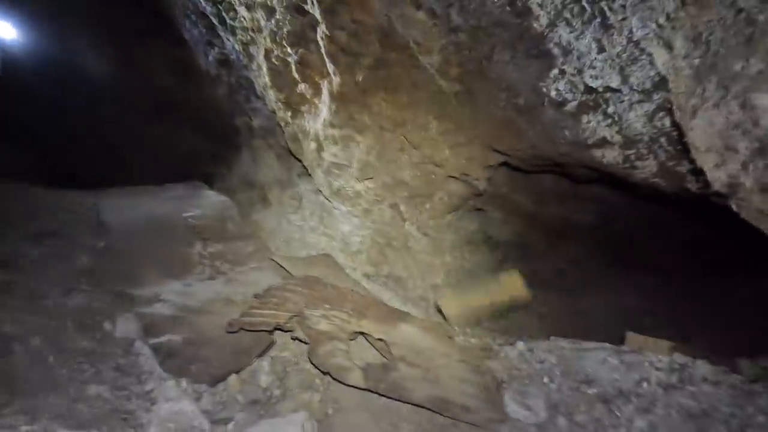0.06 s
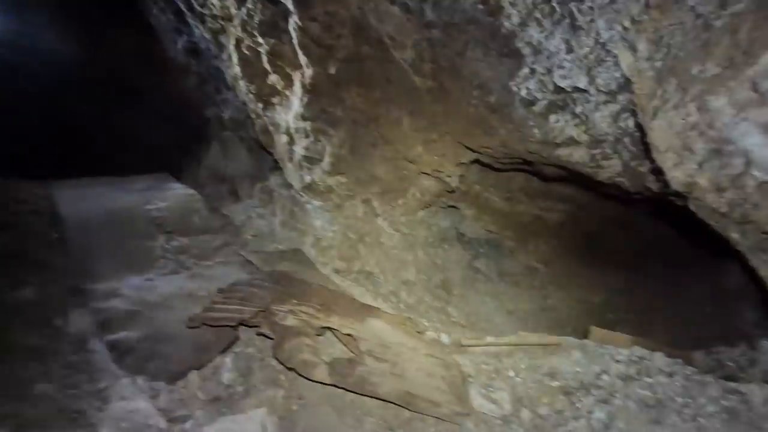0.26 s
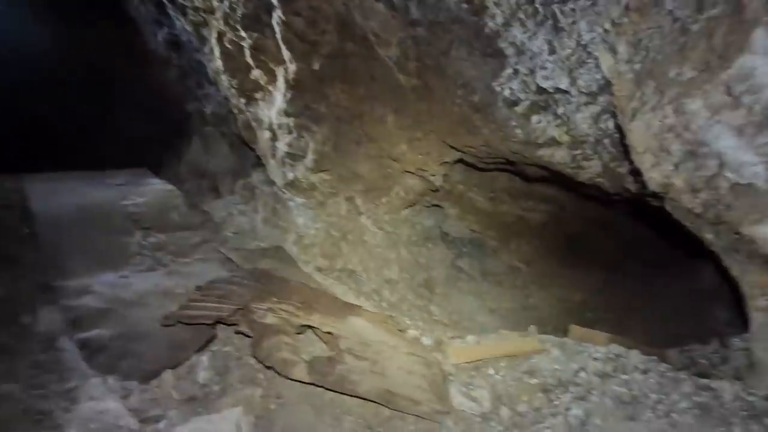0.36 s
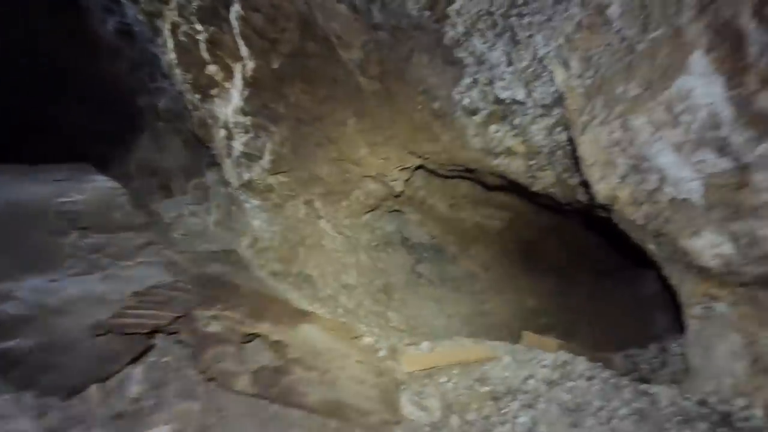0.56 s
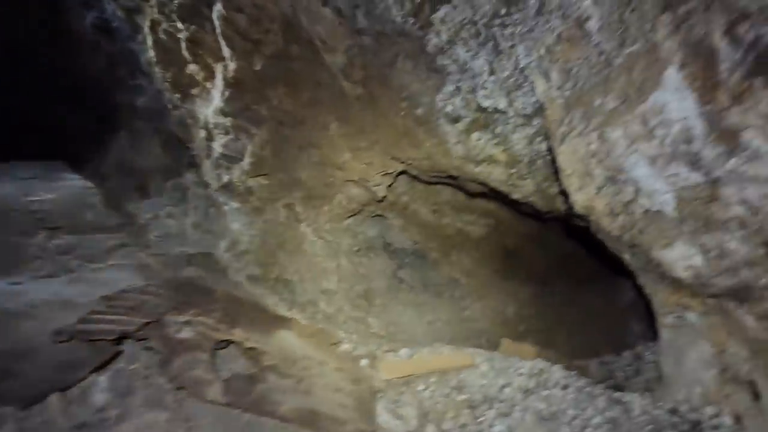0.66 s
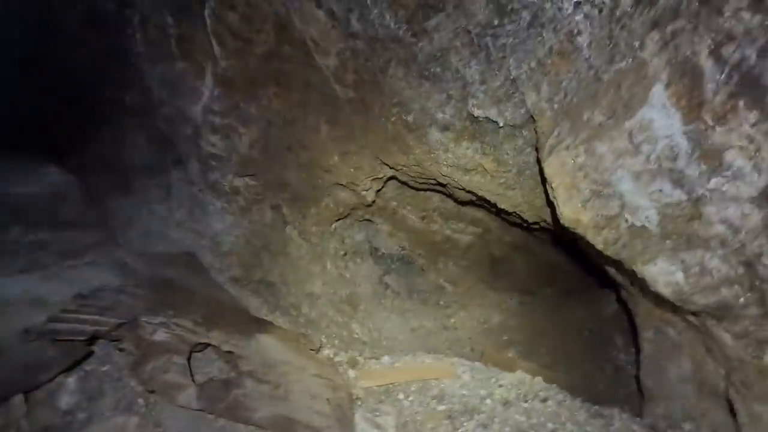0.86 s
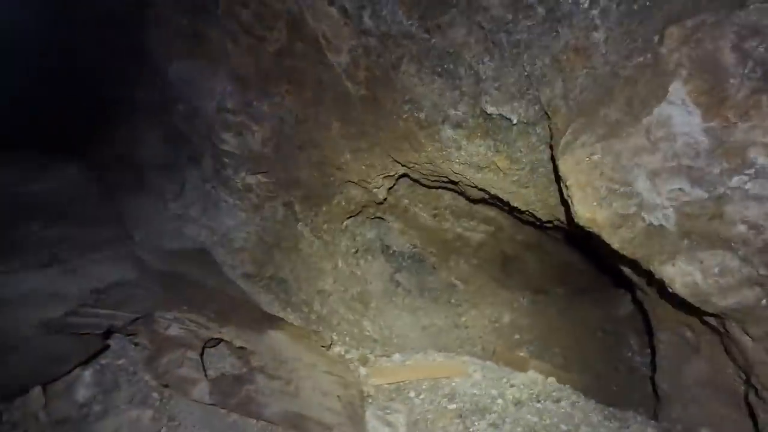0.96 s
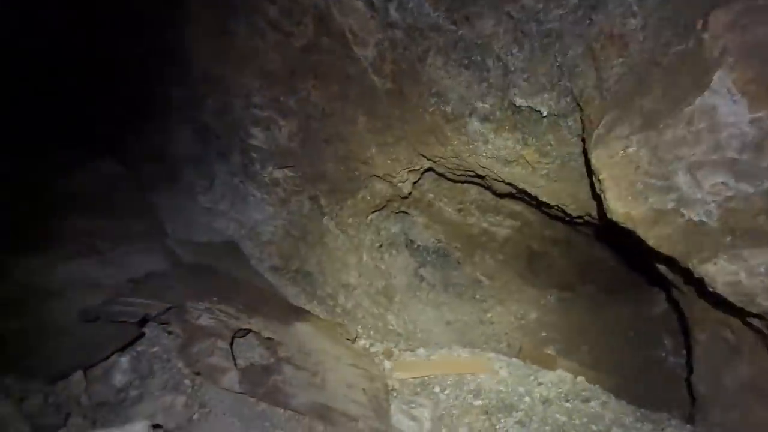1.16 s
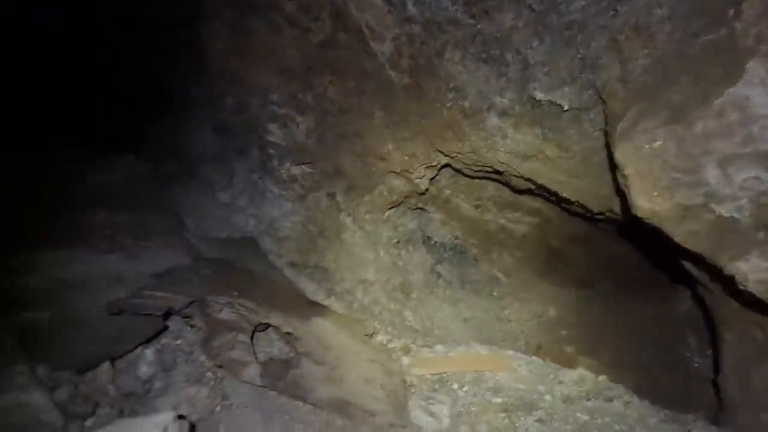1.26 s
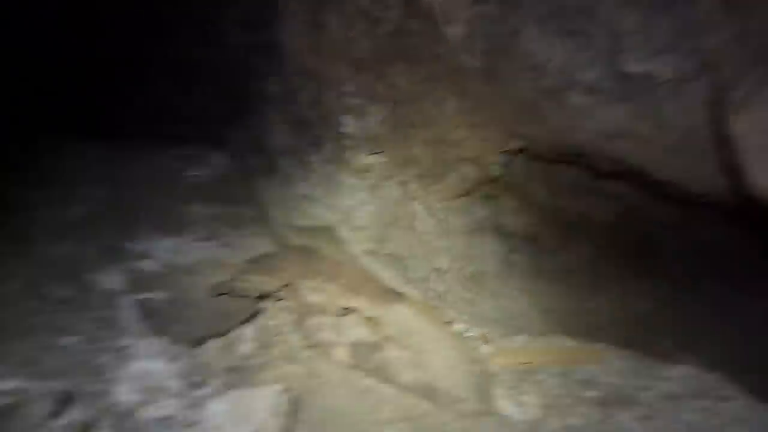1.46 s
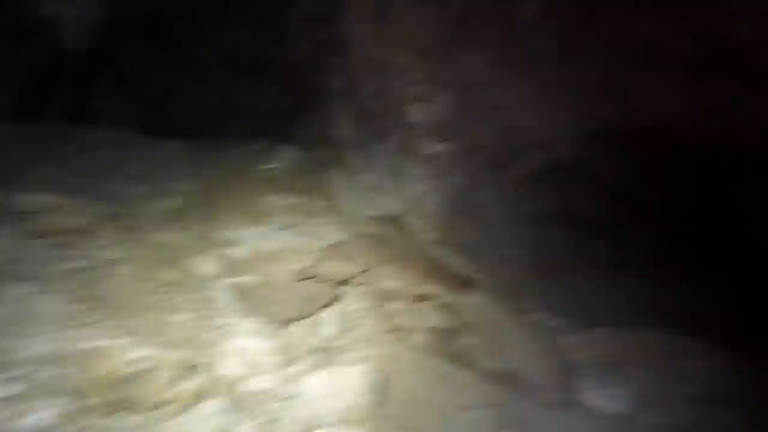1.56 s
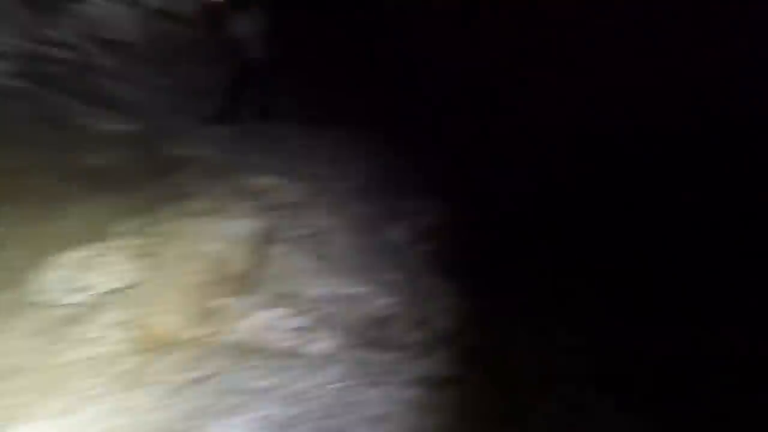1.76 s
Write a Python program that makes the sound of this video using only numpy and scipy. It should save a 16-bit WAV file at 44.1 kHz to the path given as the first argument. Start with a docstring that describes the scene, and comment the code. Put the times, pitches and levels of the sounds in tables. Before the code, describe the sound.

A short wooden board clatters onto gravel and slides to rest in a rock passage.

```python
"""A short board is tossed onto gravel in a narrow rock passage. From the start the air hisses, a
hand-held camera rumbles slowly and boots shift faintly on grit. The board lands on one end, then the
other: each blow cracks on the stones, thuds in the ground and sets the wood ringing. It lies down,
which stops the ring, and slides crunching into the stones. Last, pebbles tick and knock.
All along, the rock walls answer the stones and grit with a short echo."""
import sys
import numpy as np
from scipy import signal
from scipy.fft import rfft, irfft, next_fast_len
from scipy.io import wavfile

SR = 44100
rng = np.random.default_rng(int(sys.argv[2]) if len(sys.argv) > 2 else 0)


def wav_out(sig):
    """Save sig, one row per channel (or a flat mono array), as 16-bit PCM at SR to the path in sys.argv[1]."""
    wavfile.write(sys.argv[1], SR, np.round(np.clip(np.atleast_2d(sig).T, -1, 1) * 32767).astype(np.int16))


N = 79380

# A fade is the time to die away by 60 dB. Pan is left minus right. Likeness 1 means both sides match.
# Tone of the still air: pitch_hz, level_db
AIR_TONE = [(70, -42), (105, -22), (170, -6.5), (400, -13.5), (800, -19.5), (1600, -20.5), (2600, -28.5),
            (5300, -37.5), (7000, -39), (12000, -42.5), (15500, -68)]
# The air's loudness, and how alike its two sides are: pitch_hz, likeness
AIR_DB, AIR_LIKENESS = -67.5, [(150, 0.79), (1000, 0.3), (8000, 0.6)]
# Tone of the camera's rumble: pitch_hz, level_db
RUMBLE_TONE = [(2, -39), (4, 9.5), (20, -3.5), (35, -9), (50, -23), (70, -48), (100, -82.5)]
# How the rumble swells and dips: time_s, level_db
RUMBLE_LEVELS = [(0.0, -44), (0.36, -44.5), (0.566, -56), (0.6, -38.5), (0.822, -58), (1.162, -40),
                 (1.218, -57), (1.282, -41.5), (1.332, -57.5), (1.8, -42.5)]
# Boots shifting on grit: start_s, length_s, level_db, pitch_hz, treble_db
BOOT_SCUFFS = [(0.07, 0.51, -57, 1403, -15), (0.605, 0.21, -68, 2644, -2), (0.744, 0.03, -61, 1050, -12),
               (0.859, 0.019, -54.5, 2420, -11.5), (0.94, 0.033, -52.5, 1700, -7),
               (0.953, 0.055, -58.5, 803, -25.5), (1.193, 0.096, -59.5, 916, -14),
               (1.357, 0.13, -67, 1215, -34), (1.498, .09, -56.5, 700, -19), (1.539, 0.21, -72, 1500, -4),
               (1.73, 0.073, -60.5, 934, -13)]
# The board hitting the gravel: start_s, crack_db, treble_db, pan_db, ring_db, thud_db
BOARD_BLOWS = [(0.2104, -14.5, 22, -0.5, -11.5, -35), (.2175, -14, -8.5, -7.5, -9.5, -28),
               (0.24, -6, -7, 0.5, -16.5, -20), (0.2449, -13.5, -27.5, 0.5, -20, -24),
               (0.436, -35.5, -9, -0.5, -50, -42.5)]
# Tone of wood cracking on stones: pitch_hz, level_db
CRACK_TONE = [(60, -54.5), (150, -6), (320, -19), (546, -18.5), (910, -13), (1590, -20), (3050, -19.5),
              (6870, -25.5), (15500, -43.5)]
# Notes the board rings with: pitch_hz, level_db, fade_s
BOARD_NOTES = [(227.6, 0.5, 0.18), (323.5, 2, 1.1), (745.5, -21.5, 0.78), (907.2, -5, 0.72),
               (1256, -8.5, 0.18), (1657, -1, .15), (1620, -10.5, 0.38), (2085, -24.5, 0.9),
               (2190, -5.5, .1), (3050, -3.5, 0.075), (4310, 6.5, 0.036)]
# Low notes of the ground's thud: pitch_hz, level_db, fade_s
GROUND_NOTES = [(80.3, -7, 0.25), (113.46, 0.5, 0.19), (184.6, -9.5, 0.26)]
# Gravel crunching under the sliding board: time_s, level_db, treble_db
SLIDE_LEVELS = [(0.405, -40.5, -27.5), (0.415, -51.5, 3), (0.425, -34, -16.5), (0.435, -39.5, 2),
                (0.441, -21.5, -9.5), (0.457, -31.5, 3), (0.539, -53.5, -28.5), (0.6, -73, -20)]
# Notes that ring as the board slides into the gravel: pitch_hz, level_db, fade_s
SLIDE_RING_NOTES = [(745, -4, .3), (867, 0, .4), (935, -4, .3), (1140, -3, .12), (1320, -4, .12),
                    (1846, -5, .2), (2401, -6, .15)]
# Pebbles dropping: start_s, level_db, ring_db, pan_db
PEBBLE_TICKS = [(0.5484, -56.5, -19, -8), (0.5901, -42, -1, -3), (0.6238, -45, -4, 2),
                (0.6354, -46, -21, -9.5), (0.6779, -48, -5, -4), (0.6989, -59, -1, -3),
                (0.7142, -48.5, -4, 0.5), (0.752, -55, -5, -10.5), (0.771, -68.5, -24, 10.5),
                (0.8255, -59.5, -38, -10.5), (1.0131, -61.5, -12, 6), (1.4397, -71, 1.5, 16),
                (1.7556, -57, -12, -16)]
# Stones bumping: start_s, level_db, pitch_hz, pan_db
STONE_KNOCKS = [(.730, -43.5, 1490, 11), (.7355, -40, 1150, 0.5), (.862, -66, 2120, -33),
                (.868, -67, 2770, -12), (.938, -38, 2306, 2.5), (.9485, -37, 805, -0.5),
                (.954, -41.5, 900, 7), (1.744, -47, 1044, 5), (1.753, -54.5, 1110, -6)]
# How long the passage echoes: pitch_hz, fade_s
ECHO_FADES = [(100, 0.78), (500, 0.41), (2000, 0.34), (6000, 0.31), (14000, 0.28)]
# How alike the echo's two sides are: pitch_hz, likeness
ECHO_LIKENESS = [(300, 1), (700, 0.64), (3000, .5), (12000, .3)]
# Tone of the microphone's openings: pitch_hz, gain_db
MIC_TONE = [(3500, 1), (5300, -2), (7200, 0), (10000, -4)]

CRACK_FADE_S, CRACK_TREBLE_HZ = 0.04, 6000
SETTLE_S, SETTLED_DB_PER_S = 0.37, 279  # when the board lies down, and how fast that stops its ring
PEBBLE_HZ, PEBBLE_FADE_S = 3703, 0.018
SNAP_LOW_HZ, SNAP_TOP_HZ, SNAP_FADE_S = 5030, 10410, 0.016
MIC_DULL_HZ, MIC_TOP_HZ, LEFT_LAG_S = 13510, 15800, 1.2e-5


def amp(db):
    """Turns decibels into a number to multiply by."""
    return 10 ** (np.asarray(db) / 20)


def unit(x):
    """Scales a sound to an average power of 1."""
    return x / np.sqrt(np.mean(x ** 2) + 1e-20)


def along(points, hz):
    """Reads a table between its rows, on a scale of octaves."""
    pitches, values = np.transpose(points)
    return np.interp(np.log(hz + 1), np.log(pitches + 1), values)


def filtered(x, response):
    """Turns each pitch up or down by response(hz)."""
    size = next_fast_len(x.shape[-1] + 8192)
    return irfft(rfft(x, size) * response(np.fft.rfftfreq(size, 1 / SR)), size)[..., :x.shape[-1]]


def spread(pair, likeness):
    """Blends two unrelated sounds into a partly alike left and right."""
    turn = lambda hz: np.arccos(np.clip(along(likeness, hz), -1, 1)) / 2
    mid, side = filtered(pair, lambda hz: np.array([np.cos(turn(hz)), np.sin(turn(hz))]))
    return np.array([mid + side, mid - side])


def add(out, start_s, sound, pan_db):
    """Places a sound in time and between left and right."""
    i = int(round(start_s * SR))
    out[:, i:i + len(sound)] += (amp([[pan_db / 2], [-pan_db / 2]]) * sound)[:, :N - i]


def still_air():
    """Still air makes a faint, steady hiss."""
    noise = filtered(rng.standard_normal((2, N)), lambda hz: amp(along(AIR_TONE, hz)))
    return amp(AIR_DB) * unit(spread(noise, AIR_LIKENESS))


def camera_rumble(pan_db=-5, likeness=0.4):
    """The camera moves in the hand, making a deep noise that swells and dips."""
    noise = filtered(rng.standard_normal((2, N)), lambda hz: amp(along(RUMBLE_TONE, hz)))
    times, db = np.transpose(RUMBLE_LEVELS)
    level = amp(np.interp(np.arange(N) / SR, times, db) + [[pan_db / 2], [-pan_db / 2]])
    return level * unit(spread(noise, [(20, likeness)]))


def click(t, hz, cycles):
    """Stone taps stone: a tone that starts within one wave and dies in a few."""
    return (1 - np.exp(-2 * t * hz)) * np.exp(-t * hz / cycles) * np.sin(2 * np.pi * hz * t)


def grains(count, hz, cycles, octaves, spiky_db):
    """Grains rub together: tiny clicks of random pitch and strength, all through the scene."""
    chance = rng.random((count, 2))
    pitches = np.clip(hz * 2 ** (octaves * rng.standard_normal(count)), 250, 14000)[:, None]
    t = np.arange(320) / SR
    strength = amp(-spiky_db * np.log(chance[:, 1:]))  # a few clicks stand out
    clicks = strength * click(t, pitches, cycles) * (1 - t / t[-1])
    places = (chance[:, :1] * N).astype(int) + np.arange(len(t))
    return unit(np.bincount(places.ravel(), clicks.ravel())[:N])


def boot_scuffs(rise_share=0.25):
    """Boots shift the grit in short swells that rise quickly and fall more slowly."""
    out, t = np.zeros(N), np.arange(N) / SR
    fine = grains(count=9000, hz=7000, cycles=2.5, octaves=0.4, spiky_db=4.5)
    for start_s, length_s, db, hz, treble_db in BOOT_SCUFFS:
        progress = (t - start_s) / length_s
        swell = np.clip(np.minimum(progress / rise_share, (1 - progress) / (1 - rise_share)), 0, 1)
        coarse = grains(count=3000, hz=hz, cycles=2.5, octaves=0.5, spiky_db=2)
        out += amp(db) * swell * (coarse + amp(treble_db) * fine)
    return rock_passage(out * amp([[1.5], [-1.5]]), echo_db=-0.95)


def rock_passage(x, echo_db):
    """A sound plus its echo off the rock, where low pitches last longest."""
    hz, t, noise = signal.stft(rng.standard_normal((2, SR)), SR, nperseg=256)
    fade = amp(-60 * t / along(ECHO_FADES, hz)[:, None])
    tail = spread(signal.istft(noise * fade, SR, nperseg=256)[1], ECHO_LIKENESS)
    delayed = np.pad(x, ((0, 0), (150, 0)))
    echo = signal.fftconvolve(delayed, tail / np.linalg.norm(tail[0]), axes=1)[:, :N]
    return x + amp(echo_db) * echo


def ringing(notes, scatter_db=1):
    """A struck thing rings with several fading notes, a little different in strength each time."""
    t = np.arange(SR // 2) / SR
    out = np.zeros(len(t))
    for hz, db, fade_s in notes:
        level = amp(db + rng.normal() * scatter_db - 60 * t / fade_s)
        rise = 1 - np.exp(-t * hz)
        out += level * rise * np.sin(2 * np.pi * hz * t)
    return out


def board_landing():
    """Each blow cracks on the stones, thuds in the ground and rings the board until it lies down."""
    hits, ring, t = np.zeros((2, N)), np.zeros((2, N)), np.arange(SR // 8) / SR
    treble_share = lambda hz: hz ** 2 / (hz ** 2 + CRACK_TREBLE_HZ ** 2)
    for start_s, crack_db, treble_db, pan_db, ring_db, thud_db in BOARD_BLOWS:
        tone = lambda hz: amp(along(CRACK_TONE, hz) + treble_db * treble_share(hz))
        noise = unit(filtered(rng.standard_normal(len(t)), tone))
        add(hits, start_s, amp(crack_db - 6 - 60 * t / CRACK_FADE_S) * noise, pan_db)
        add(ring, start_s, amp(ring_db - 14) * ringing(BOARD_NOTES), pan_db=0)
        add(hits, start_s, amp(thud_db) * ringing(GROUND_NOTES), pan_db=0)
    settling = amp(-SETTLED_DB_PER_S * np.maximum(np.arange(N) / SR - SETTLE_S, 0))
    return rock_passage(hits, echo_db=0) + ring * settling


def board_slide():
    """Stones and grit crunch under the sliding board; the slide rings faintly."""
    times, db, treble_db = np.transpose(SLIDE_LEVELS)
    t = np.arange(N) / SR
    level = amp(np.interp(t, times, db, left=-120, right=-120))
    grit_level = level * amp(np.interp(t, times, treble_db))
    stones = level * grains(count=12000, hz=1306, cycles=2.5, octaves=0.4, spiky_db=1.2)
    grit = grit_level * grains(count=14000, hz=5510, cycles=1.5, octaves=0.57, spiky_db=3)
    ring = ringing(SLIDE_RING_NOTES)
    slide_ring = amp(-20.5) * signal.fftconvolve(stones, ring / np.linalg.norm(ring))[:N]
    return rock_passage((stones + grit + slide_ring) * amp([[-0.7], [0.7]]), echo_db=-9)


def pebbles():
    """Small stones drop and settle: bright ticks (a dry snap with a short ring) and duller knocks."""
    out, t = np.zeros((2, N)), np.arange(1024) / SR
    snap_tone = lambda hz: hz ** 2 / (hz ** 2 + SNAP_LOW_HZ ** 2) / (1 + (hz / SNAP_TOP_HZ) ** 4)
    for start_s, db, ring_db, pan_db in PEBBLE_TICKS:
        noise = unit(filtered(rng.standard_normal(len(t)), snap_tone))
        snap = amp(-5 - 60 * t / SNAP_FADE_S) * noise
        ring = amp(ring_db - 60 * t / PEBBLE_FADE_S) * np.sin(2 * np.pi * PEBBLE_HZ * t)
        add(out, start_s, amp(db) * (ring + snap), np.clip(pan_db, -6, 6))
    for start_s, db, hz, pan_db in STONE_KNOCKS:
        add(out, start_s, 2 * amp(db) * click(t, hz, cycles=1.2), pan_db)
    return rock_passage(out, echo_db=-5.5)


def scene():
    """The board and stones, over the boots, air and rumble."""
    return board_landing() + board_slide() + pebbles() + boot_scuffs() + still_air() + camera_rumble()


def record(dry):
    """Two close microphone openings colour the sound and lose its top; the left hears a little later."""
    lag = lambda hz: np.exp(1j * np.pi * hz * LEFT_LAG_S * np.array([[-1], [1]]))
    treble_cut = lambda hz: (hz < MIC_TOP_HZ) / np.sqrt(1 + (hz / MIC_DULL_HZ) ** 10)
    return filtered(dry, lambda hz: lag(hz) * amp(along(MIC_TONE, hz)) * treble_cut(hz))


dry = scene()
out = record(dry)
wav_out(out)
```